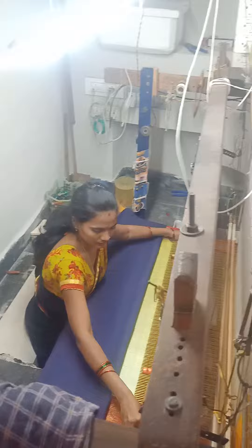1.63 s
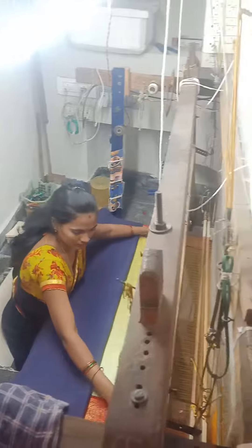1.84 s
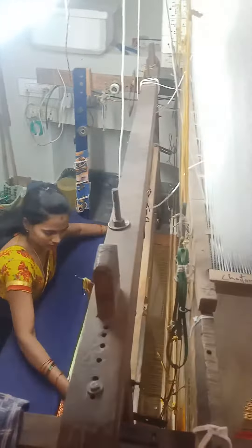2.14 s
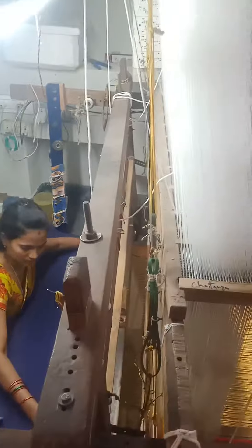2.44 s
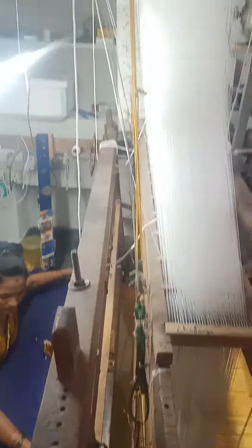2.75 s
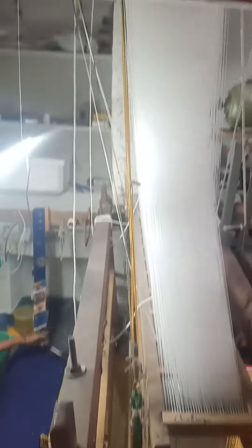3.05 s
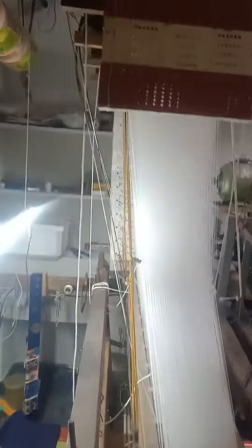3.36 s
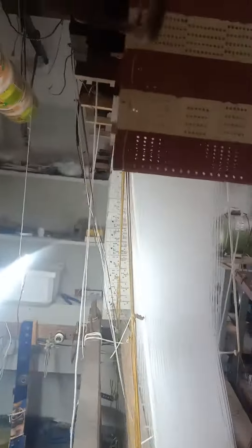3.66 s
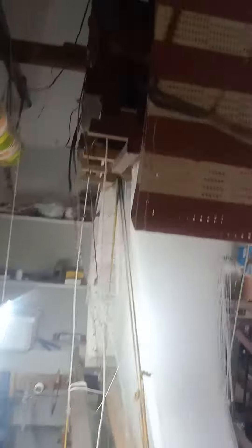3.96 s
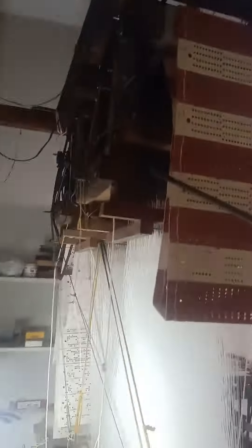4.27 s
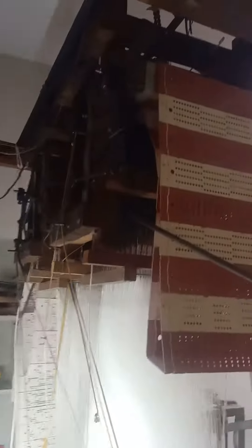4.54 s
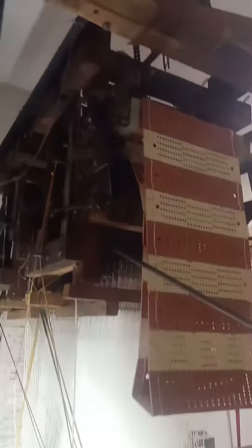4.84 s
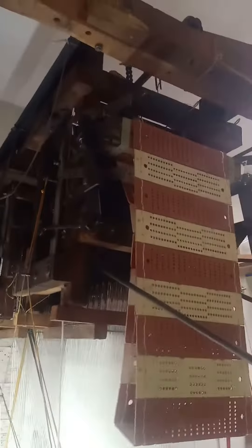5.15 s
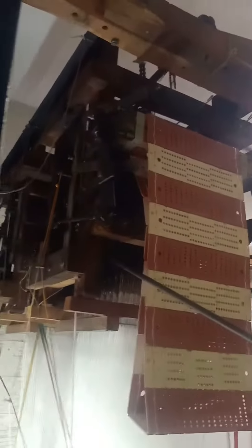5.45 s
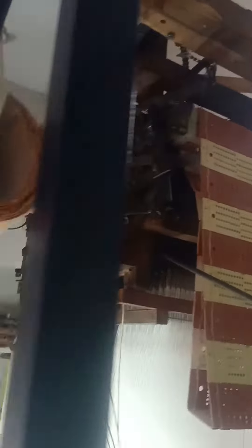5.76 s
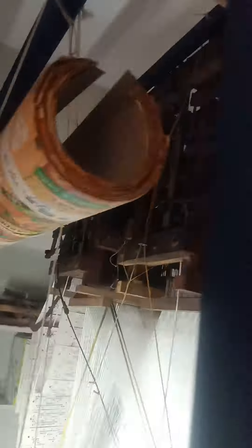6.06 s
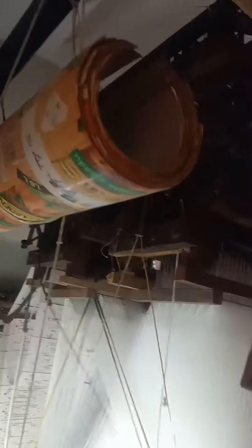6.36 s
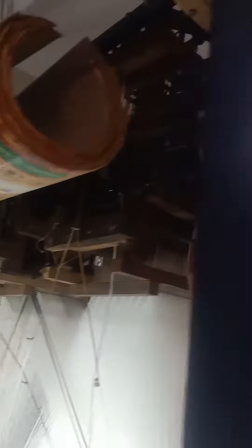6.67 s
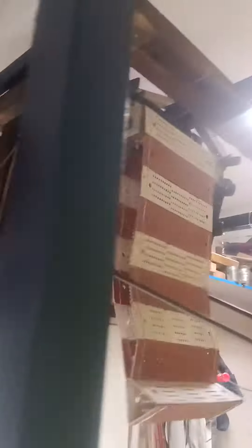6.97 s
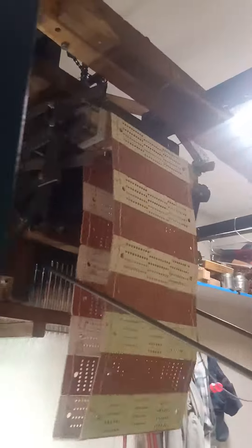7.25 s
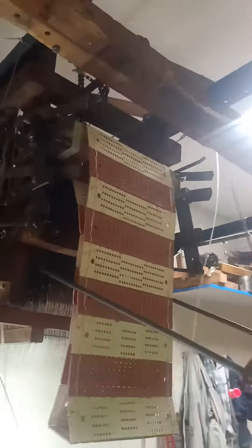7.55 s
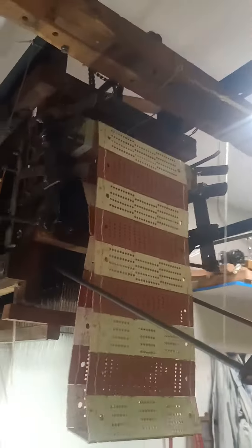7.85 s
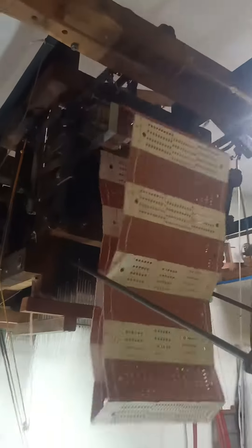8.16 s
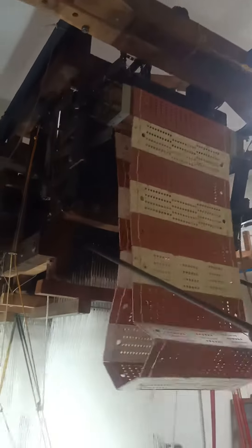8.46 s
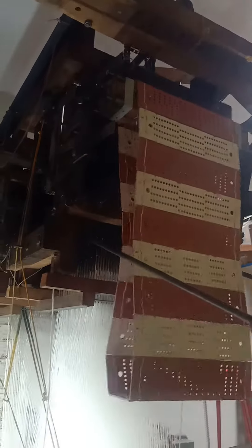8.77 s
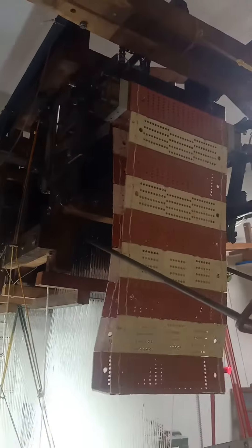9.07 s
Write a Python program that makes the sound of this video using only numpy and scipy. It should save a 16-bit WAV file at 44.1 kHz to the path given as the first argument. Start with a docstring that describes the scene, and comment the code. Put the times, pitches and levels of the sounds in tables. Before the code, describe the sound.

A handloom starts at once with a sharp iron clack and a briefly singing spring. Wooden slats and cards clatter, wire hooks rattle and a treadle knocks dully over a low timber rumble. Near 1.8 seconds the movement dies away in small, high wire pings. From about 2 to 3.3 seconds there is a pause with only faint ticks, pings and room hush. The loom restarts at 3.3 seconds and runs in uneven bursts of clacking and rattling, with hollow knocks and light metal chinks between strokes. A strong cluster of clacks comes around 4.8 seconds, with further hard strokes near 5.7, 6.6 and 8.2 seconds and rattling between them. From about 8.4 seconds the loose wires ping and fade, and one small dry tick follows near 9 seconds. The room is quiet, with a short reverberation.

```python
"""In a plain room a jacquard handloom is worked: a short spell of weaving, a pause, then a longer one.
Each impact excites the natural modes of the part it strikes: treadle and lever knock, the iron lifting
frame clacks, slats and cards clatter, and hundreds of wire hooks and weights rattle over the rumble of
the timber frame. A link chinks, a spring sings, and the last wires ping as the loom comes to rest.
The room adds early reflections, a short reverberation and a faint hush."""
import sys
import numpy as np
from scipy import signal
from scipy.fft import rfft, irfft, next_fast_len
from scipy.io import wavfile

SR = 44100
rng = np.random.default_rng(int(sys.argv[2]) if len(sys.argv) > 2 else 0)


def generate_wav(signal):
    """Clip the signal to [-1, 1] and save it as 16-bit WAV at the path in sys.argv[1]."""
    frames = np.transpose(np.atleast_2d(signal))
    scaled = np.clip(frames, -1, 1) * 32767
    pcm = np.round(scaled).astype(np.int16)
    wavfile.write(sys.argv[1], SR, pcm)


N = 401751
TIME = np.arange(N) / SR

# Single blows of the mechanism. Each row: time in seconds, energy given to wood, iron and wires in dB.
BLOW_ENERGIES = [(.146, -4.5, 13.5, 6), (.44, -16, -12, -18), (.487, -13, -25, -0.5), (.524, -2, -9, -20),
                 (.622, -9, -13, -7), (1.257, -13, -4, 3.5), (1.512, -27, -3, 8.5), (2.128, -13, -29, -40),
                 (2.341, -22.5, -42, -37), (3.333, -8, -7.5, -15.5), (3.601, -18, -2, -10.5),
                 (3.642, 2.5, 1.5, -8), (3.754, -13, 4, -12), (3.85, -3.5, 3, -14), (4.145, -2.5, -2, -1.5),
                 (4.194, -21, -9, 8), (4.747, 9.5, 7.5, -5), (4.773, 9, 13.5, -3.5), (4.802, 9, 7, -7),
                 (4.836, 6.5, -8, -22), (5.092, -17, 11, -2.5), (5.103, 7.5, 2.5, -21),
                 (5.419, -4.5, -9.5, -16), (5.727, 2, 15, -2), (6.327, -14, -6, 6), (6.404, -8, -21, 0),
                 (6.563, 4.5, -13, -8), (6.613, -10, 17.5, 5), (6.903, -4, 9.5, -3.5),
                 (7.133, -10, -12, -20), (7.204, -29, -4, -5.5), (7.953, -13, -9, 8), (8.2, 5.5, 6.5, 9.5),
                 (8.259, -17, -16, 4.5)]
# Spectrum of a click on a wire. Each row: frequency in Hz, spectral level in dB.
WIRE_SPECTRUM = [(200, -33.5), (1000, -10), (2400, -3.5), (3400, -8.5), (4500, -2.5), (5300, 7), (6100, -1),
                 (7100, -11), (8800, -12), (11200, -10.5), (14000, -12.5), (16000, -17)]


def gain_of(db):
    """Amplitude ratio of a level in decibels."""
    return 10 ** (np.asarray(db) / 20)


def unit_rms(x):
    """Normalisation to a mean power of 1."""
    return x / np.sqrt(np.mean(x ** 2) + 1e-20)


def unit_energy(x):
    """Normalisation to an energy of 1 in each channel."""
    return x / np.sqrt(np.sum(x ** 2, axis=-1, keepdims=True) + 1e-20)


def curve_at(points, hz):
    """Interpolation on a logarithmic frequency axis."""
    point_hz, value = np.transpose(points)
    return np.interp(np.log(hz + 1), np.log(point_hz), value)


def add(mix, start_s, sound):
    """Superposition: a sound adds to the mix from its start time on."""
    part = mix[max(round(start_s * SR), 0):][:len(sound)]
    part += sound[:len(part)]


def through(drive, response):
    """A linear system convolves its drive with its impulse response."""
    return signal.oaconvolve(drive, response)[:N]


def click(spectrum, size=4096):
    """Minimum phase gives the shortest causal click that has a given spectrum."""
    log_gain = np.log(gain_of(curve_at(spectrum, abs(np.fft.fftfreq(size, 1 / SR)))))
    minimum_phase = np.exp(np.conj(signal.hilbert(log_gain)))
    return unit_energy(np.fft.ifft(minimum_phase).real[:size // 2])


def ringing(modes, size=SR):
    """Free vibration: each mode is a damped sinusoid that falls 60 dB in its time T60."""
    t = np.arange(size) / SR
    out = np.zeros(size)
    for hz, db, t60 in modes:
        tone = np.sin(2 * np.pi * (hz * t + rng.random()))
        out += gain_of(db) * unit_energy(gain_of(-60 * t / t60) * tone)
    return unit_energy(out)


def struck(spectrum, modes, ring_db, size=16384):
    """Impulse response of a solid body: a contact click, then the ringing of its modes."""
    out = gain_of(ring_db) * ringing(modes, size)
    add(out, 0, click(spectrum))
    return unit_energy(out)


def collisions(per_s, spread_db, size=N):
    """A Poisson process of small impacts: many weak, a few strong."""
    strength = gain_of(spread_db * np.minimum(rng.exponential(1, size), 4))
    return unit_rms(strength * rng.choice([-1, 1], size) * (rng.random(size) < per_s / SR))


def blows(times, levels_db, chatter_s, contact_share, size=4096):
    """A blow's energy divides between one hard contact and a decaying chatter of loose parts."""
    out, t = np.zeros(N), np.arange(size) / SR
    for start_s, db in zip(times, levels_db):
        chatter = collisions(per_s=5000, spread_db=3.5, size=size) * np.exp(-t / chatter_s)
        burst = np.sqrt(1 - contact_share) * unit_energy(chatter)
        burst[0] = np.sqrt(contact_share)
        add(out, start_s, gain_of(db) * burst)
    return out


def shaking(group, fall_db_per_s, linger_db, rise_s=0.024, settle_db_per_s=45.5, size=65536):
    """Incoherent rattles add in power: each swells with a jerk, holds and drops; a few parts linger."""
    # Jerks of the mechanism. Each row: start and length in seconds, then the levels in dB of
    # wood and cards, iron, wires and timber frame.
    jerks = [(0.0, 0.0079, -38.5, -31.5, -41, -51.5), (0.486, 0.052, -30.5, -33.5, -36.5, -57),
             (0.701, 0.025, -37, -38.5, -42.5, -62), (0.803, .14, -40, -32, -30, -52.5),
             (1.11, 0.14, -47, -43, -50, -57), (1.204, 0.04, -38.5, -34, -37.5, -47.5),
             (1.268, 0.081, -37.5, -35.5, -36, -58), (1.454, 0.069, -32.5, -29, -29, -46),
             (1.561, 0.079, -43, -42.5, -34, -60), (1.693, .05, -42, -45.5, -54, -56),
             (2.132, .03, -58, -60, -69, -78), (3.313, 0.012, -37.5, -59, -43, -51),
             (3.483, 0.3, -40.5, -42, -49, -53.5), (3.716, 0.066, -37, -23.5, -24.5, -48),
             (3.82, 0.069, -34, -34.5, -32.5, -48.5), (4.14, 0.14, -36.5, -28, -37, -48),
             (4.288, 0.13, -30, -33.5, -40, -56), (4.421, 0.037, -34, -25, -26.5, -45.5),
             (4.55, 0.16, -38.5, -42.5, -39.5, -57.5), (4.72, 0.047, -24, -31.5, -49, -60),
             (5.161, 0.016, -49, -32.5, -38.5, -64), (5.34, 0.32, -42, -41.5, -46.5, -55),
             (5.56, 0.059, -40, -36, -37, -62), (5.603, 0.07, -35, -24.5, -24, -43),
             (5.663, 0.027, -28.5, -23, -50, -44), (5.983, .11, -28.5, -28.5, -40, -56),
             (6.259, 0.17, -37.5, -33, -36, -48.5), (6.541, 0.027, -32.5, -20.5, -25, -44),
             (6.678, 0.021, -41, -53, -37, -53), (7.03, 0.18, -53, -48, -70, -71),
             (7.209, 0.089, -28, -30.5, -38.5, -52.5), (7.405, 0.033, -32.5, -59, -35, -57),
             (7.513, 0.07, -37.5, -26, -26, -48.5), (7.612, 0.08, -33.5, -32, -31, -49.5),
             (7.87, 0.086, -34, -29, -37.5, -46.5), (7.994, 0.017, -29.5, -26.5, -27, -56),
             (8.146, 0.04, -28, -24.5, -25.5, -42.5), (8.277, 0.053, -54, -39.5, -40, -65),
             (8.39, 0.048, -41.5, -48, -65, -57)]
    column = ["wood", "iron", "wires", "frame"].index(group)
    power, t = np.zeros(N), np.arange(size) / SR
    for start_s, length_s, *levels_db in jerks:
        attack = gain_of(levels_db[column]) * np.minimum(t / rise_s, 1)
        after_s = np.maximum(t - length_s, 0)
        falling = gain_of(-fall_db_per_s * after_s)
        lingering = gain_of(linger_db - settle_db_per_s * after_s)
        add(power, start_s, attack ** 2 * (falling ** 2 + lingering ** 2))
    return np.sqrt(power)


def shared_bass(pair, corner_hz=330):
    """Spatial coherence: long waves reach both microphone ports alike."""
    size = next_fast_len(pair.shape[1] + 4096)
    hz = np.fft.rfftfreq(size, 1 / SR)
    coherence = 0.97 / np.sqrt(1 + (hz / corner_hz) ** 4)
    left, right = rfft(pair, size)
    right = coherence * left + np.sqrt(1 - coherence ** 2) * right
    return irfft(np.array([left, right]), size)[:, :pair.shape[1]]


def room_response(direct_db, early_db, lag_ms, early_s=0.0084, size=32768):
    """Direct sound and early reflections off the loom's beams, in dB relative to the diffuse tail."""
    # Reverberation of the room. Each row: frequency in Hz, T60 in seconds.
    reverberation = [(100, 0.84), (400, 0.56), (1000, 0.56), (2500, 0.41), (5500, 0.36), (9000, 0.3),
                     (16000, 0.26)]
    late_taps, early_taps = rng.choice([-1., 1.], (2, 2, size)) * (rng.random((2, 2, size)) < 5000 / SR)
    hz, t, bands = signal.stft(late_taps, SR, nperseg=256)
    decay = gain_of(-60 * t / curve_at(reverberation, hz)[:, None])
    tail = signal.istft(bands * decay, SR, nperseg=256)[1][:, :size]
    early = early_taps * np.exp(-np.arange(size) / SR / early_s)
    response = unit_energy(tail) + gain_of(early_db) * unit_energy(early)
    response[0, 0] += gain_of(direct_db)
    response[1, round(lag_ms * SR / 1000)] += gain_of(direct_db)
    return unit_energy(shared_bass(response))


def room(source, direct_db, early_db, lag_ms, positions=4, crossfade_s=0.11):
    """Multipath propagation: the paths through the room shift slowly, so the colour of the room changes from
    stroke to stroke."""
    position = TIME / crossfade_s
    out = np.zeros((2, N))
    for k in range(positions):
        away = abs((position - k + positions / 2) % positions - positions / 2)
        part = source * np.cos(np.pi / 2 * np.minimum(away, 1))
        out += [through(part, side) for side in room_response(direct_db, early_db, lag_ms)]
    return out


def hush(base_db=-69.5):
    """The noise floor of the workshop: faint coloured noise whose level drifts down."""
    # Colour of the noise. Each row: frequency in Hz, spectral level in dB.
    spectrum = [(15, -57), (25, -50), (40, -26), (55, -7), (229, -12.5), (309, -8.5), (344, -13), (451, -5),
                (1330, -11), (2220, -8.5), (3430, -23), (5570, -16.5), (10700, -64.5), (13600, -39),
                (16000, -27)]
    # Slow drift. Each row: time in seconds, level above the base in dB.
    drift = [(0, 11.5), (3.3, 10), (8.5, 1.5), (9.11, 2)]
    size = next_fast_len(N)
    colour = gain_of(curve_at(spectrum, np.fft.rfftfreq(size, 1 / SR)))
    noise = irfft(rfft(rng.standard_normal((2, size))) * colour, size)
    level_db = base_db + np.interp(TIME, *np.transpose(drift))
    return gain_of(level_db) * unit_rms(shared_bass(noise)[:, :N])


def timber_frame():
    """Forced vibration: the moving parts drive the low modes of the heavy frame, which rumbles."""
    # Impact on the frame. Each row: frequency in Hz, spectral level in dB.
    spectrum = [(30, -26.5), (60, -26.5), (120, -6.5), (175, 4), (260, 5), (400, 15), (700, 1), (1500, -54),
                (16000, -82)]
    # Frame modes. Each row: frequency in Hz, energy in dB, T60 in seconds.
    modes = [(122.4, -0.5, 0.27), (170.6, -1.5, 0.079), (229, -9.5, 0.51)]
    drive = shaking("frame", fall_db_per_s=169, linger_db=-5.5) * collisions(per_s=910, spread_db=3)
    rumble = through(drive, struck(spectrum, modes, ring_db=-9))
    return gain_of(0.5) * room(rumble, direct_db=0.5, early_db=2, lag_ms=0.05)


def latch(start_s=8.96):
    """A transient without ringing: one small, dry tick as the mechanism settles."""
    # The tick. Each row: frequency in Hz, spectral level in dB.
    spectrum = [(150, -12.5), (450, 3), (1000, -3), (2200, 1), (3500, -11), (5300, -3), (8000, -27),
                (16000, -42)]
    out = np.zeros(N)
    add(out, start_s, gain_of(-23.5) * click(spectrum))
    return room(out, direct_db=-10, early_db=0, lag_ms=0.13, positions=2)


def return_spring():
    """Light damping lets the steel spring sing on after the first clack."""
    # A strike, then bounces on the hook. Each row: time in seconds, energy in dB.
    strikes = [(0.144, -26), (0.351, -17), (0.383, -17.5)]
    # Spring modes. Each row: frequency in Hz, energy in dB, T60 in seconds.
    modes = [(2740, -15, 0.65), (2740, 3.5, 0.16), (5140, -1, .45), (5560, -17, .4)]
    out = np.zeros(N)
    for start_s, db in strikes:
        add(out, start_s, gain_of(db) * ringing(modes))
    return np.array([out, 0.8 * out])


def link_chinks(detune=0.03):
    """Contact shifts natural frequencies: a light iron link is caught a little differently each time."""
    # Chinks between the strokes. Each row: time in seconds, energy in dB.
    chinks = [(2.025, -21.5), (4.075, -5.5), (5.365, -7.5), (5.466, -1.5), (5.549, 1), (5.921, -4),
              (5.969, -2), (7.863, -5), (8.139, -2)]
    # Impact on the link. Each row: frequency in Hz, spectral level in dB.
    spectrum = [(300, -52), (1400, -20), (1750, 4.5), (2600, 3), (3300, -11), (4100, -7.5), (5500, -4),
                (8000, -24.5), (16000, -44)]
    # Link modes. Each row: frequency in Hz, energy in dB, T60 in seconds.
    modes = [(1763, -19.5, .1), (2073, 7.5, 0.057), (2546, -1, .1), (2770, 2.5, 0.036), (3700, -5, .08)]
    out = np.zeros(N)
    for start_s, db in chinks:
        shifted = [(hz * (1 + detune * rng.standard_normal()), level, t60) for hz, level, t60 in modes]
        add(out, start_s, gain_of(db) * struck(spectrum, shifted, ring_db=-3, size=8192))
    return room(out, direct_db=-16, early_db=-3.5, lag_ms=0.3, positions=2)


def wire_pings(detune=0.0092, brightening=0.74, medium_db=-16):
    """Free wires ring clearly: a soft touch is mostly ring, a hard one clicks and excites upper modes."""
    # Touches of swinging wires. Each row: time in seconds, energy in dB.
    touches = [(1.759, -6.5), (1.84, -10), (1.898, -12.5), (1.937, -13), (1.962, -14), (2.025, -30),
               (2.2, -33), (2.28, -36), (2.513, -31), (2.754, -26), (2.982, -27), (8.362, -1.5),
               (8.483, -7), (8.568, -6.5), (8.628, -10), (8.674, -8.5), (8.721, -15.5), (8.894, -28)]
    # Wire modes. Each row: frequency in Hz, energy in dB, T60 in seconds.
    modes = [(4660, -12, 0.33), (5660, 27, 0.12), (5500, 10, 0.35), (5600, 8, .25), (6100, -18, 0.11),
             (8150, 13, 0.17), (8750, 11, 0.2), (10440, 16, 0.14), (11200, 26, 0.073), (13684, 16, 0.07),
             (14250, 1, .24), (15100, -16, .25)]
    lowest_hz = modes[0][0]
    out = np.zeros(N)
    for start_s, db in touches:
        hardness_db = db - medium_db
        excited = []
        for hz, mode_db, t60 in modes:
            shifted_hz = hz * (1 + detune * rng.standard_normal())
            tilt_db = brightening * hardness_db * np.log2(hz / lowest_hz)
            excited.append((shifted_hz, mode_db + 2 * rng.standard_normal() + tilt_db, t60))
        touch = blows([0], [db], chatter_s=0.003, contact_share=0.7)[:2048]
        wire = struck(WIRE_SPECTRUM, excited, ring_db=-2 - 0.67 * hardness_db, size=8192)
        add(out, start_s, signal.fftconvolve(touch, wire))
    return room(out, direct_db=-9, early_db=1, lag_ms=0.34)


def treadle_knocks(width_hz=135, blow_s=0.011, shudder_s=0.076, bounces_per_s=110, settle_s=0.28):
    """A soft blow excites the low modes of a long wooden member, which then shudders in its bearing."""
    # Dull, hollow knocks of treadle and lever. Each row: start in seconds, level in dB, pitch in Hz,
    # level of the shudder relative to the blow in dB.
    knocks = [(0.441, -38, 423, 0), (0.741, -34, 390, -7), (0.968, -34.5, 392, -7.5),
              (3.331, -28.5, 394, -10), (3.637, -36, 420, -7), (3.923, -24, 403, -15),
              (5.188, -32, 431, -6), (5.384, -49, 447, 8), (5.554, -37, 408, -3.5), (6.021, -36, 447, 2),
              (7.131, -45.5, 440, 7.5), (7.451, -34.5, 432, -0.5), (7.639, -32, 450, 1.5)]
    # Modes of the member. Each row: frequency as a multiple of the pitch, level in dB.
    modes = [(1, 0), (1.3, -8.5), (2.02, -15)]
    size = 8192
    out, t = np.zeros((2, N)), np.arange(size) / SR
    blow_envelope = (t / blow_s) ** 2 * np.exp(2 * (1 - t / blow_s))
    swell = np.pi * width_hz * t
    bounce_envelope = swell * np.exp(-swell)
    for start_s, db, hz, shudder_db in knocks:
        tone = np.sqrt(2) * sum(gain_of(level) * np.sin(2 * np.pi * ratio * hz * t)
                                for ratio, level in modes)
        for side in out:
            slots = np.arange(1, 1 + shudder_s * bounces_per_s)
            bounce_s = (slots + rng.random(len(slots))) / bounces_per_s
            strengths = rng.uniform(0.5, 1, len(slots)) * np.exp(-bounce_s / settle_s)
            bounces = np.bincount((bounce_s * SR).astype(int), strengths, size)
            shudder = signal.fftconvolve(bounces, bounce_envelope * tone)[:size]
            shudder = gain_of(shudder_db) * unit_energy(shudder) * np.sqrt(shudder_s * SR)
            add(side, start_s, gain_of(db) * (blow_envelope * tone + shudder))
    echo = room(out.mean(0), direct_db=-35, early_db=4, lag_ms=0.3, positions=2)
    return 0.5 * out + 0.27 * out[::-1] + gain_of(-6) * echo


def wood_clatter():
    """Damped midrange modes give slats and punched cards their short, hollow clatter."""
    # Impact on wood. Each row: frequency in Hz, spectral level in dB.
    spectrum = [(60, -55), (200, -21), (380, -13), (520, -3.5), (670, -0.5), (850, 0), (1080, -4),
                (1700, -6.5), (2700, -5), (4000, -23.5), (16000, -64.5)]
    # Wood modes. Each row: frequency in Hz, energy in dB, T60 in seconds.
    modes = [(547, -17.5, 0.15), (697, 0.5, 0.17), (780, -4.5, 0.27), (849, 3, 0.16), (928, 7, .1)]
    times, wood_db, _, _ = np.transpose(BLOW_ENERGIES)
    drive = shaking("wood", fall_db_per_s=212.5, linger_db=-11) * collisions(per_s=900, spread_db=4.5)
    drive += blows(times, wood_db, chatter_s=0.0069, contact_share=0.64)
    clatter = through(drive, struck(spectrum, modes, ring_db=-15.5))
    return gain_of(-1.8) * room(clatter, direct_db=-15.5, early_db=2, lag_ms=0.41)


def iron_clanks():
    """Hard contact is broadband: lifting frame, guides and card cylinder clank, with a faint ring."""
    # Impact on iron. Each row: frequency in Hz, spectral level in dB.
    spectrum = [(100, -47), (500, -15), (1050, -7.5), (1350, -9), (1700, -3), (2150, -0.5), (2750, 0.5),
                (3300, -10), (4000, -6), (5300, -2), (6100, -8.5), (7200, -17), (10000, -38), (16000, -47)]
    # Iron modes. Each row: frequency in Hz, energy in dB, T60 in seconds.
    modes = [(1320, -11, 0.35), (1537, 6.5, 0.21), (1690, -25, 0.25), (2277, -8.5, 0.033),
             (2583, -19.5, .08), (2640, 4, 0.06), (4140, -29.5, .1), (5290, 11.5, .06)]
    times, _, iron_db, _ = np.transpose(BLOW_ENERGIES)
    drive = shaking("iron", fall_db_per_s=210, linger_db=-10) * collisions(per_s=900, spread_db=3)
    drive += blows(times, iron_db, chatter_s=0.011, contact_share=0.26)
    clanks = through(drive, struck(spectrum, modes, ring_db=-24))
    return gain_of(-0.47) * room(clanks, direct_db=-19, early_db=-2, lag_ms=0.42)


def wire_rattle(count=48, neighbours=12, wires_per_s=18, t60_s=0.053):
    """Hooks, needles and hanging weights collide, each tinkling in its own inharmonic modes."""
    mode_ratios, modes_db = np.array([1, 1.5, 2.15, 2.55]), (1, 5, 1.5, 8.5)
    times, _, _, wire_db = np.transpose(BLOW_ENERGIES)
    drive = shaking("wires", fall_db_per_s=196.5, linger_db=-12) * collisions(per_s=800, spread_db=3)
    drive += blows(times, wire_db, chatter_s=0.0035, contact_share=0.09)
    # A few neighbouring wires ring at a time, and the group moves on as the pattern changes.
    wire_hit = (rng.integers(0, neighbours, N) + (wires_per_s * TIME).astype(int)) % count
    out = np.zeros(N)
    for wire in range(count):
        pitches_hz = rng.uniform(4600, 6100) * mode_ratios * rng.uniform(0.91, 1.09, 4)
        modes = [(hz, db, t60_s) for hz, db in zip(pitches_hz, modes_db)]
        out += through(drive * (wire_hit == wire), struck(WIRE_SPECTRUM, modes, ring_db=-11))
    return gain_of(0.36) * room(out, direct_db=-41.5, early_db=-3.5, lag_ms=0.42)


def scene():
    """Superposition of all parts of the loom and the noise of the room."""
    rattle = timber_frame() + wood_clatter() + iron_clanks() + wire_rattle()
    return rattle + link_chinks() + wire_pings() + return_spring() + latch() + treadle_knocks() + hush()


def record(dry, cutoff_hz=16000):
    """The two microphone ports differ in frequency response; a low-pass filter limits the band."""
    # Balance of the ports. Each row: frequency in Hz, level of left over right in dB.
    balance = [(60, 0.5), (99, 0.5), (160, -0.5), (270, -0.5), (450, -1.0), (740, 0.5), (1220, -4),
               (2010, -3.5), (3330, 0), (5500, -1), (9080, -6), (15000, -6)]
    size = next_fast_len(N + 4096)
    balance_db = curve_at(balance, np.fft.rfftfreq(size, 1 / SR))
    ports = gain_of(np.array([balance_db, -balance_db]) / 2)
    ports /= np.sqrt(np.mean(ports ** 2, axis=0))
    heard = irfft(rfft(dry, size) * ports, size)[:, :N]
    low_pass = signal.firwin(511, cutoff_hz, window=("kaiser", 9), fs=SR)
    return signal.oaconvolve(heard, low_pass[None], "same")


dry = scene()
out = record(dry)
generate_wav(out)
```